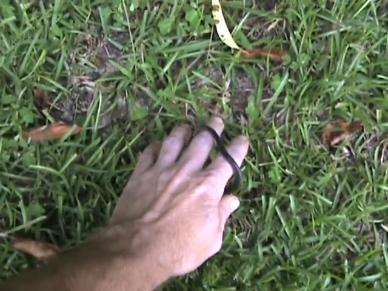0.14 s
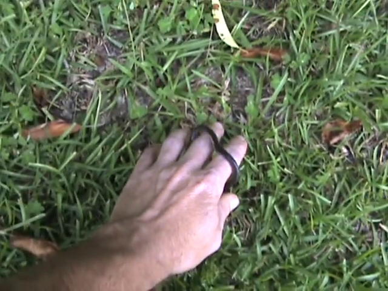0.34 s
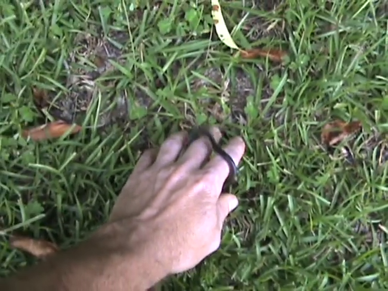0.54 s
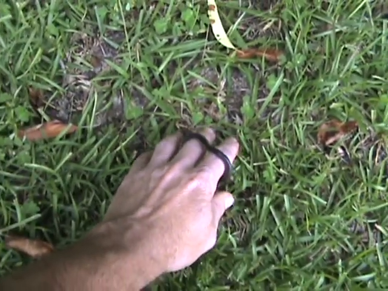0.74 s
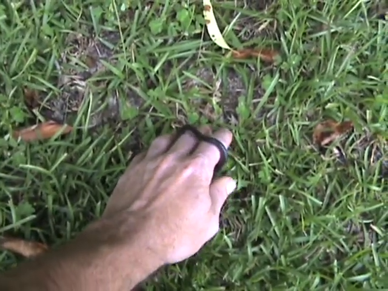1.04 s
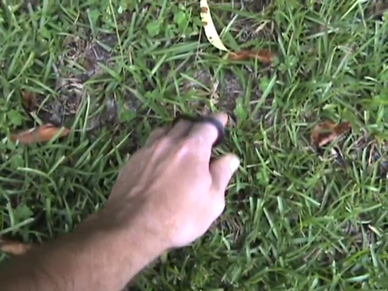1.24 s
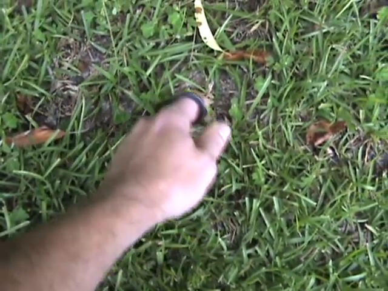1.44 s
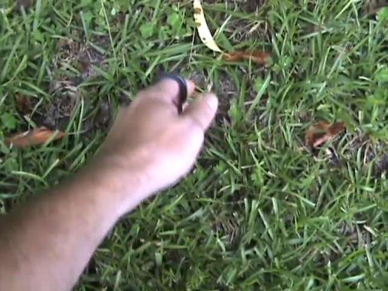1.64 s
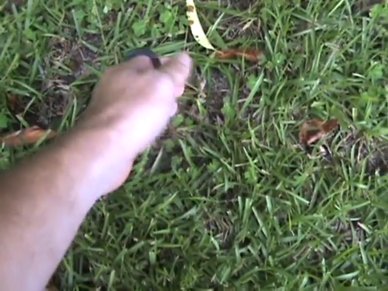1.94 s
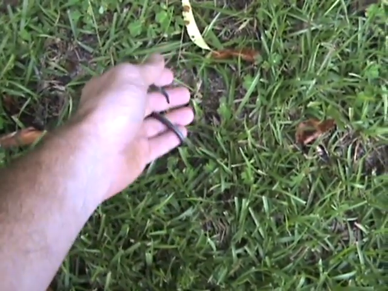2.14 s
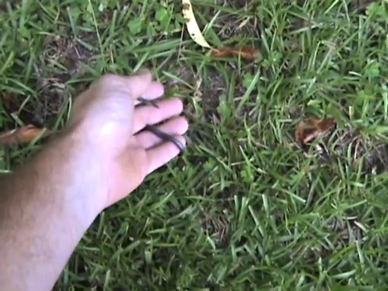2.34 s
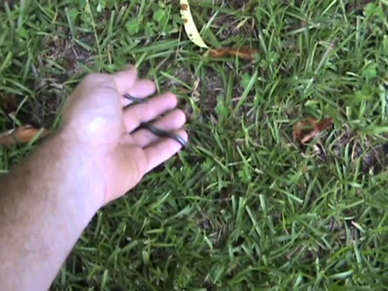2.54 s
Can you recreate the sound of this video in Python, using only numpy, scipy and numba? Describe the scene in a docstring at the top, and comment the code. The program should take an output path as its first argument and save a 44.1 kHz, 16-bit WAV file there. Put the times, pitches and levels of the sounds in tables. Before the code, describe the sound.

A nearby cricket trills shrilly throughout, about eleven small groups of fast falling strokes each second, with short yard echoes. Behind it, distant crickets trill steadily with faint buzzy chirps, hiss and low traffic rumble. A sharp plastic handling tick lands at 0.23 seconds, weaker ones near 0.92 and 1.32. A very faint tone passes around 1.0, a high fizz rises after 1.5, and a barely audible rub comes at 2.4.

```python
"""A near cricket trills in short groups of falling wing strokes, each a gliding tone through two resonances.
Ticks ring the modes of the handheld camera's case; far buzzy chirps are clicks and puffs through a resonance.
A far chorus trills steadily in a grassy yard whose scattered echoes are noise tails.
Shaped noise makes low traffic rumble, insect-bright hiss and a rising high fizz; a faint tone and a rub pass."""
import sys
import numpy as np
from scipy import signal
from scipy.io import wavfile
from scipy.ndimage import uniform_filter1d
from numba import njit

SR = 44100
rng = np.random.default_rng(int(sys.argv[2]) if len(sys.argv) > 2 else 0)


def output_pcm(signal):
    """Save a mono or channel-first signal as 16-bit PCM at the path in sys.argv[1].

    Samples are clipped to [-1, 1] before scaling.
    """
    pcm = np.clip(np.atleast_2d(signal).T, -1, 1) * 32767
    wavfile.write(sys.argv[1], SR, np.round(pcm).astype(np.int16))


def decibels_to_gain(level_db):
    """Convert a level in decibels to a linear amplitude gain (20 dB per decade)."""
    exponent = np.asarray(level_db, float) / 20
    return 10 ** exponent


N = 119070

# Traffic rumble spectrum: (frequency [Hz], relative density [dB per Hz])
RUMBLE_SPECTRUM = [(20, -78), (35, -57), (45, -3), (55, -7.5), (68, -8), (85, -8), (105, 0), (120, -7.5),
                   (137, 2.5), (160, -8), (200, -9), (280, -16), (400, -22.5), (560, -41.5)]
# Hiss spectrum, humped where insects sing: (frequency [Hz], relative density [dB per Hz])
HISS_SPECTRUM = [(150, -65), (300, -1.5), (1000, 0.5), (2100, -8), (2700, -8.5), (3100, -2), (3600, 3),
                 (4200, -3), (5100, -16), (6000, -7.5), (6800, 0.5), (7200, 9), (7650, 3.5), (8100, 0.5),
                 (8350, 3.5), (8600, 3), (9100, -13.5), (10300, -14.5), (12000, -43), (14000, -43),
                 (15300, -8), (16000, -32)]
# Far high fizz spectrum: (frequency [Hz], relative density [dB per Hz])
FIZZ_SPECTRUM = [(9500, -11), (11000, -3.5), (12000, 0), (13500, -5), (15000, -6), (16500, -8)]
# Fizz fading up: (time [s], level [dB])
FIZZ_FADE = [(0, -97), (1.3, -82), (1.6, -61), (2.1, -58.5), (2.7, -52.5)]
# Likeness of left and right in the noise beds: (frequency [Hz], correlation [-1 to 1])
STEREO_LIKENESS = [(60, 0.89), (130, 1), (290, 0.55), (640, 0.2), (1410, -0.18), (3100, 0.61), (6820, 0.85),
                   (15000, -0.032)]
# Balance of the noise beds: (frequency [Hz], left minus right [dB])
STEREO_LEAN = [(60, 1.5), (180, 1.5), (550, 2), (1650, 2.5), (4970, -0.5), (15000, -1.5)]
# Faint tone's fader: (time [s], level before its two parts are summed [dB])
TONE_FADE = [(.65, -70), (.75, -73), (.95, -68), (1.03, -57), (1.12, -71), (1.22, -67), (1.3, -113)]
# Far trillers: (mean pitch [Hz], mean stroke rate [per s], direct level [dB], left minus right [dB])
TRILLERS = [(8597, 53, -61.5, -8), (7630, 80, -50, -1), (7830, 140, -53.5, 8), (7297, 51, -52.5, -13),
            (7940, 64, -58.5, 13), (8890, 57, -73.5, -7)]
# Far buzzy chirps: (start [s], length before the fade [s], level before fades [dB],
# mid-chirp centre [Hz], width of each resonance pass [Hz])
BUZZY_CHIRPS = [(0.204, 0.09, -51.5, 4370, 350), (0.33, 0.045, -48.5, 3760, 487),
                (0.751, 0.092, -58, 3910, 300), (0.917, 0.11, -54.5, 3630, 500),
                (1.086, 0.071, -50.5, 4420, 332), (1.225, 0.11, -54, 3730, 386),
                (1.308, 0.11, -55.5, 4320, 550), (1.584, 0.063, -52, 3780, 500),
                (1.955, 0.063, -49, 3850, 450), (2.04, 0.099, -53, 4370, 400),
                (2.038, 0.072, -53.5, 3650, 400), (2.31, 0.071, -51.5, 4500, 380),
                (2.32, 0.08, -51, 3760, 400), (2.62, 0.1, -53.5, 3610, 500)]
# Knocks: (time [s], peak before pan [dB], favoured frequency [Hz], spread [octaves], left minus right [dB])
KNOCKS = [(.2347, -19.5, 2600, 1.5, -2), (.9172, -32, 5500, .5, .6), (.9175, -40, 2300, .3, 1),
          (1.3178, -32, 380, .5, 4), (1.3182, -37, 2400, .3, 2)]
# Modes of the plastic case: (frequency [Hz], strength before favouring [dB], 60 dB decay [s])
CASE_MODES = [(300, -10, .03), (520, -12, .022), (800, 1, .013), (1030, -6, .012), (1310, 0, .014),
              (1680, -1, .013), (2150, -6, .013), (2500, -6, .013), (3100, -11, .01), (3640, -8, .009),
              (4900, -15, .008), (5450, -12, .008), (5850, -11, .008), (6450, -12, .008),
              (11000, -16, .008)]
# Trill groups: (first stroke [s], last stroke [s], level before scatter and path [dB])
STROKE_GROUPS = [(0.004, 0.015, -29.5), (0.053, 0.094, -30), (0.128, 0.183, -30), (0.227, 0.315, -29.5),
                 (0.35, 0.428, -31), (0.461, 0.535, -30.5), (0.57, 0.607, -30), (0.647, 0.72, -30.5),
                 (0.756, 0.819, -30), (0.852, 0.907, -29.5), (0.938, 0.983, -30.5), (1.018, 1.079, -28),
                 (1.107, 1.154, -28.5), (1.186, 1.243, -30.5), (1.274, 1.319, -29.5), (1.353, 1.412, -30.5),
                 (1.44, 1.499, -30.5), (1.536, 1.594, -30), (1.624, 1.683, -31.5), (1.715, 1.773, -31.5),
                 (1.814, 1.884, -31), (1.918, 1.974, -32), (2.004, 2.047, -31), (2.075, 2.133, -32),
                 (2.173, 2.268, -31), (2.302, 2.373, -32), (2.409, 2.467, -30.5), (2.493, 2.521, -30.5),
                 (2.551, 2.594, -30.5), (2.622, 2.664, -31), (2.697, 2.712, -29)]
# One wing stroke around its loudest moment: (time [s], full-glide pitch [Hz], relative level [dB])
WING_STROKE = [(-.0085, 8350, -22), (-.0065, 8050, -7), (-.004, 7800, -2), (-.0005, 7640, 0),
               (.0015, 7450, -2), (.0035, 7260, -2), (.006, 7330, -2), (.0085, 7450, -20)]
# What the path to the microphone favours: (time [s], upper resonance [Hz], lower resonance level [dB],
# lower resonance [Hz], upper width per pass [Hz], echo level [dB], share of the glide [0 to 1])
SOUND_PATH = [(0, 7710, -9, 7330, 190, -10, 1), (.7, 7715, -9, 7330, 190, -10, 1),
              (1.2, 7690, -9, 7330, 200, -9, .9), (1.6, 7645, -9, 7340, 240, -8, .65),
              (2.1, 7610, -12, 7300, 250, -8, .55), (2.7, 7610, -12, 7300, 250, -8, .55)]
# Uncoloured part of the near song: (left level [dB], right level [dB])
UNCOLOURED = [-19, -13]

YARD_T60_S, YARD_LIKENESS = .22, .72  # echo decay, left-right correlation
RUMBLE_DB, HISS_DB = -47, -43.5
TONE_HZ, TONE_FUZZ_WIDTH_HZ = 1089, 15
RUB_START_S, RUB_LENGTH_S, RUB_DB = 2.41, .055, -51.5
RUB_FROM_HZ, RUB_TO_HZ, RUB_WIDTH_HZ = 350, 500, 80
CHORUS_SWEEP_HZ, CHORUS_ECHO_DB = 117, 6  # sweep each side of the pitch
CHORUS_PACE_WANDER, CHORUS_PITCH_WANDER_HZ = .08, 30  # rms; pace as a share of the rate
CHIRP_EARLY_S, CHIRP_RISE_S, CHIRP_FADE_S = .008, .028, .025  # lead-in, rise, overhang after the length
CHIRP_SAG_HZ, CHIRP_ECHO_DB = 180, -1
BUZZ_HZ, BUZZ_UNEVEN = 148.6, .006  # click rate, its rms drift as a share
BUZZ_ROUGH, PUFF_SHARE = .15, .35  # weight of puffs, their decay in click periods
PORT_LAG_RAD, PORT_LAG_HZ = 1.7, 2600  # lag between ports at low pitch, halved at this frequency
TICK_RISE_S, TICK_FAVOUR_DB = .0004, 6  # favour: loss one spread away from the favoured frequency
STROKE_GAP_S, FIRST_STROKE_DB = .0146, -2.5  # approximate spacing; a group's first stroke is weaker
SCATTER_DB, SCATTER_S, SCATTER_HZ = 1.1, .0005, 25  # rms from stroke to stroke
NEAR_DB, NEAR_PAN_DB, LOWER_WIDTH_HZ = 6, -1.5, 320  # song gain, left minus right, width per pass


def evened(x):
    """Scales to rms 1."""
    return x / np.sqrt(np.mean(x ** 2) + 1e-20)


def read(points, hz):
    """Reads a spectrum table on a log frequency axis."""
    f, value = np.transpose(points)
    return np.interp(np.log(hz + 1), np.log(f + 1), value)


def along(table, column):
    """Draws one column of a timed table as a curve, sample by sample."""
    return np.interp(np.arange(N) / SR, [row[0] for row in table], [row[column] for row in table])


def sides(level_db, pan_db):
    """Left and right gains that differ by pan_db."""
    return decibels_to_gain(level_db + np.c_[[pan_db / 2, -pan_db / 2]])


def add(mix, s, sound):
    """Mixes a sound in at s seconds, trimmed to the scene."""
    at = round(s * SR)
    part = mix[..., max(at, 0):][..., :sound.shape[-1] + min(at, 0)]
    part += sound[..., max(-at, 0):][..., :part.shape[-1]]


@njit
def smoothed(x, keep):
    """One-pole low-pass whose memory may change."""
    out = x * 0
    for i in range(1, len(x)):
        out[i] = keep[i] * out[i - 1] + (1 - keep[i]) * x[i]
    return out


def resonate(x, hz, width_hz):
    """A resonance of gain 1 that follows hz: shift down to zero, low-pass, shift back."""
    turn = np.exp(2j * np.pi * np.cumsum(hz * np.ones(len(x))) / SR)
    keep = np.exp(-np.pi * width_hz * np.ones(len(x)) / SR)
    return 2 * (turn * smoothed(x / turn, keep)).real


def wander(rate_hz):
    """Slow chance of rms 1, from sines between 0.3 Hz and rate_hz."""
    t = np.arange(N) / SR
    return evened(sum(np.sin(2 * np.pi * (f * t + rng.random())) / np.sqrt(f)
                      for f in np.geomspace(.3, rate_hz, 16)))


def yard(x):
    """Scattered echoes off grass and walls; three tails take turns so that like strokes differ."""
    t, out = np.arange(SR // 3) / SR, np.zeros((2, N))
    turn = 2 * np.pi * 1.337 * np.arange(N) / SR
    for k in range(3):
        sparse = rng.random(len(t)) < .06
        decay = decibels_to_gain(-60 * t / YARD_T60_S) * (t > .002)
        a, b = rng.standard_normal((2, len(t))) * sparse * decay
        right = YARD_LIKENESS * a + np.sqrt(1 - YARD_LIKENESS ** 2) * b
        tail = np.array([a, right]) / np.linalg.norm(a)
        fed = x * np.cos(turn + k * np.pi / 3)
        out += signal.fftconvolve(fed[None], tail, axes=1)[:, :N]
    return out * np.sqrt(2 / 3)


def noise(shape, patchy_db, swell_db, size=1024):
    """Stereo noise of a given spectrum with drifting patches and a slow swell, at rms 1."""
    frames, hz = 4 * N // size + 6, np.fft.rfftfreq(size, 1 / SR)
    a, b, c, d, patches = rng.standard_normal((frames, len(hz), 5)).T
    patches = uniform_filter1d(patches, size=10, axis=0)
    patches = evened(uniform_filter1d(patches, size=14, axis=1))
    swell = np.resize(wander(5.28)[::size // 4], frames)
    same = read(STEREO_LIKENESS, hz)[:, None]
    lean = decibels_to_gain(read(STEREO_LEAN, hz) / 2)[:, None]
    left = a + 1j * b
    right = same * left + np.sqrt(1 - same ** 2) * (c + 1j * d)
    z = np.array([left * lean, right / lean])
    z *= decibels_to_gain(read(shape, hz)[:, None] + patchy_db * patches + swell_db * swell)
    return evened(signal.istft(z, nperseg=size, noverlap=size - size // 4)[1][:, :N])


def rumble():
    """Low traffic rumble: noise shaped in long frames to resolve the lows."""
    return decibels_to_gain(RUMBLE_DB) * noise(RUMBLE_SPECTRUM, patchy_db=.8, swell_db=.5, size=4096)


def hiss():
    """Steady hiss: shaped noise with a slight patchy shimmer."""
    return decibels_to_gain(HISS_DB) * noise(HISS_SPECTRUM, patchy_db=1.03, swell_db=.3)


def fizz():
    """Far high buzz: bright shaped noise that fades up."""
    return decibels_to_gain(along(FIZZ_FADE, 1)) * noise(FIZZ_SPECTRUM, patchy_db=1.5, swell_db=1.5)


def whistle():
    """A faint tone, a sine with narrow-band fuzz, peaks near one second and dies away."""
    pure = np.sqrt(2) * np.sin(2 * np.pi * TONE_HZ * np.arange(N) / SR)
    fuzz = evened(resonate(rng.standard_normal(N), TONE_HZ, TONE_FUZZ_WIDTH_HZ))
    return decibels_to_gain(along(TONE_FADE, 1)) * (.94 * pure + .59 * fuzz)


def rub():
    """A short soft low rub: noise through a resonance that rises in pitch."""
    out, u = np.zeros(N), np.arange(0, RUB_LENGTH_S, 1 / SR) / RUB_LENGTH_S
    hz = RUB_FROM_HZ + (RUB_TO_HZ - RUB_FROM_HZ) * np.sqrt(u)
    band = evened(resonate(rng.standard_normal(len(u)), hz, RUB_WIDTH_HZ))
    add(out, RUB_START_S, decibels_to_gain(RUB_DB) * np.sin(np.pi * u ** .81) * band)
    return out


def chorus():
    """Far crickets trill without pause, each stroke a falling pulse at its singer's pitch and pace."""
    out = np.zeros((2, N))
    for hz, rate, level_db, pan_db in TRILLERS:
        strokes = np.cumsum(rate * (1 + CHORUS_PACE_WANDER * wander(12))) / SR
        within = strokes % 1
        start = rng.random(400)[strokes.astype(int)]  # a fresh phase each stroke
        glide = hz + CHORUS_SWEEP_HZ * (1 - 2 * within) + CHORUS_PITCH_WANDER_HZ * wander(8)
        tone = np.sin(2 * np.pi * (np.cumsum(glide) / SR + start / 2))
        pulse = np.sin(np.pi * np.minimum(within / .48, 1)) ** 2
        voice = evened(tone * pulse * decibels_to_gain(.74 * wander(5.23)))
        out += voice * sides(level_db, pan_db)
    return out + decibels_to_gain(CHORUS_ECHO_DB) * yard(out.mean(0))


def chirps():
    """Fast, nearly steady clicks and noise puffs ring one broad, sagging resonance per chirp."""
    out = np.zeros(N)
    for start, length, level_db, hz, width_hz in BUZZY_CHIRPS:
        t = np.arange(-CHIRP_EARLY_S, length + CHIRP_FADE_S, 1 / SR)
        a, b = rng.standard_normal((2, SR // 5))[:, :len(t)]
        drift = evened(uniform_filter1d(a, size=400))
        turns = np.cumsum(BUZZ_HZ * (1 + BUZZ_UNEVEN * drift)) / SR
        clicks = sum(np.cos(2 * np.pi * k * turns) for k in range(15, 40))
        puffs = np.exp(-(turns % 1) / PUFF_SHARE) * b
        drive = (1 - BUZZ_ROUGH) * evened(clicks) + BUZZ_ROUGH * evened(puffs)
        centre = hz + CHIRP_SAG_HZ * (.5 - t / length)
        buzz = evened(resonate(resonate(drive, centre, width_hz), centre, width_hz))
        rise = np.sin(np.pi / 2 * np.minimum((t - t[0]) / CHIRP_RISE_S, 1)) ** 2
        fall = np.minimum((t[-1] - t) / (2 * CHIRP_FADE_S), 1) ** 1.5
        add(out, start - CHIRP_EARLY_S, decibels_to_gain(level_db) * buzz * rise * fall)
    return out + decibels_to_gain(CHIRP_ECHO_DB) * yard(out)


def ticks():
    """Small knocks ring the camera case's modes; low modes swing out of step at the two ports."""
    out, t = np.zeros((2, N)), np.arange(2000) / SR
    for s, peak_db, favoured_hz, spread, pan_db in KNOCKS:
        ring = np.zeros((2, len(t)))
        for hz, db, t60 in CASE_MODES:
            octaves = np.log2(hz / favoured_hz)
            decay = decibels_to_gain(db - TICK_FAVOUR_DB * (octaves / spread) ** 2 - 60 * t / t60)
            lag = np.c_[[0, PORT_LAG_RAD / (1 + (hz / PORT_LAG_HZ) ** 2)]]
            ring += decay * np.sin(2 * np.pi * hz * t - lag)
        ring *= np.minimum(t / TICK_RISE_S, 1)
        add(out, s, sides(peak_db, pan_db) * ring / abs(ring).max())
    return out


def wing_strokes():
    """The bare song: each wing stroke is a falling tone with a small upturn."""
    at, pitch_hz, stroke_db = np.transpose(WING_STROKE)
    song, t = np.zeros(N), np.arange(at[0], at[-1], 1 / SR)
    shape, hz = np.interp(t, at, decibels_to_gain(stroke_db)), np.interp(t, at, pitch_hz)
    centre_hz, share = along(SOUND_PATH, 1), along(SOUND_PATH, 6)
    for first, last, level_db in STROKE_GROUPS:
        now = min(round(first * SR), N - 1)
        # a smaller share draws the glide in towards the upper resonance
        glide_hz = hz + (share[now] - 1) * (hz - centre_hz[now])
        count = round((last - first) / STROKE_GAP_S) + 1
        for k, s in enumerate(np.linspace(first, last, count)):
            louder, later, sharper, phase = rng.standard_normal(4)
            gain = decibels_to_gain(level_db + SCATTER_DB * louder + FIRST_STROKE_DB * (k == 0))
            cycles = np.cumsum(glide_hz + SCATTER_HZ * sharper) / SR + phase
            add(song, s + at[0] + SCATTER_S * later, gain * shape * np.sin(2 * np.pi * cycles))
    return song


def near_cricket():
    """The path lifts two parts of the song with moving resonances, and the yard echoes it."""
    song = wing_strokes()
    upper, lower = song, song
    for _ in range(2):
        upper = resonate(upper, along(SOUND_PATH, 1), along(SOUND_PATH, 4))
        lower = resonate(lower, along(SOUND_PATH, 3), LOWER_WIDTH_HZ)
    coloured = upper + decibels_to_gain(along(SOUND_PATH, 2)) * lower
    direct = sides(NEAR_DB, NEAR_PAN_DB) * (coloured + decibels_to_gain(np.c_[UNCOLOURED]) * song)
    return direct + yard(decibels_to_gain(along(SOUND_PATH, 5)) * direct.mean(0))


def scene():
    """All sources together, from the background to the near cricket."""
    beds = rumble() + hiss() + fizz()
    return beds + whistle() + rub() + chorus() + chirps() + ticks() + near_cricket()


def low_pass(x):
    """Removes everything above the highest recorded frequency."""
    return signal.sosfilt(signal.butter(12, 15730, fs=SR, output="sos"), x)


def record(dry):
    """Hands over the finished mix."""
    return low_pass(dry)


dry = scene()
out = record(dry)
output_pcm(out)
```